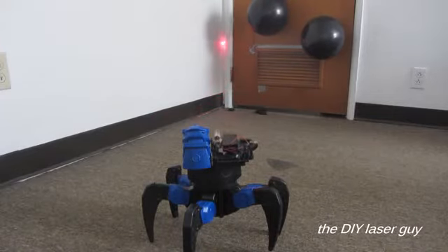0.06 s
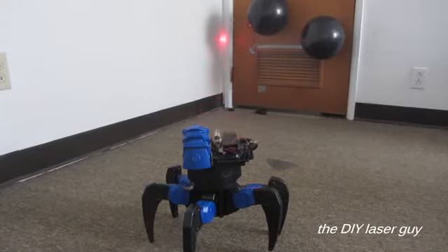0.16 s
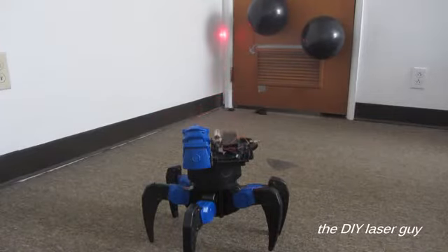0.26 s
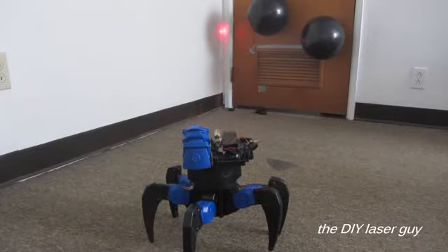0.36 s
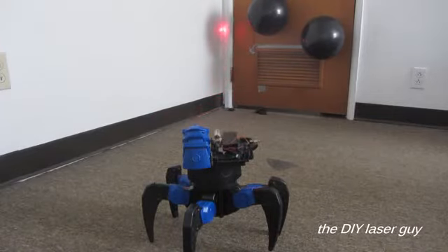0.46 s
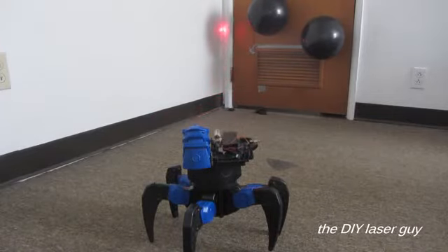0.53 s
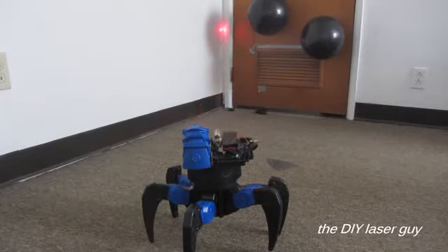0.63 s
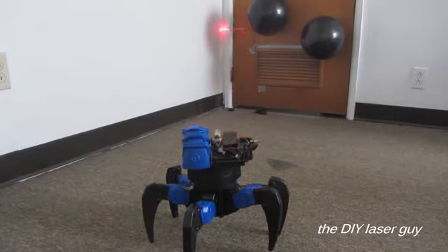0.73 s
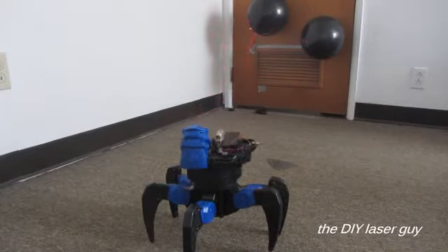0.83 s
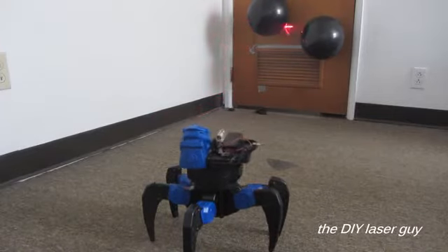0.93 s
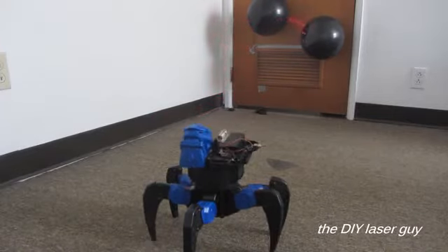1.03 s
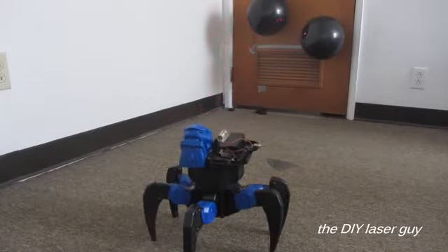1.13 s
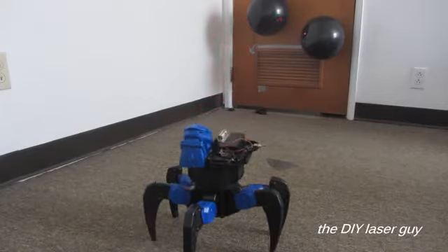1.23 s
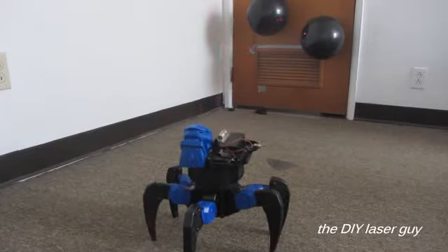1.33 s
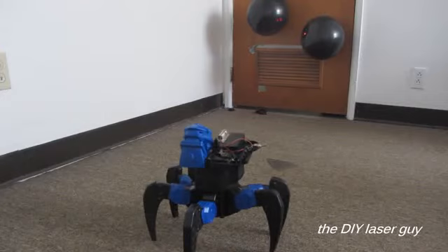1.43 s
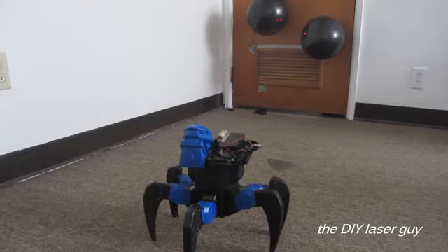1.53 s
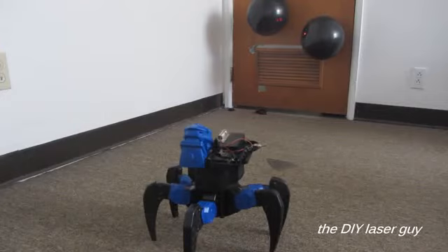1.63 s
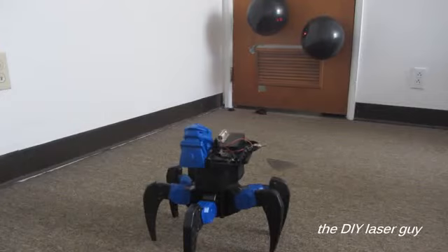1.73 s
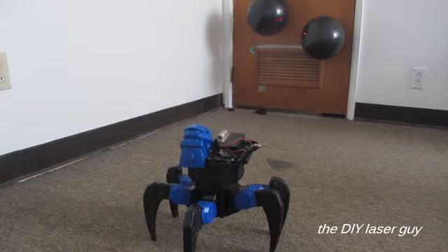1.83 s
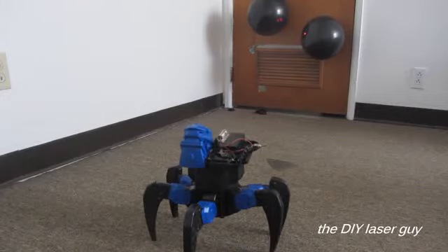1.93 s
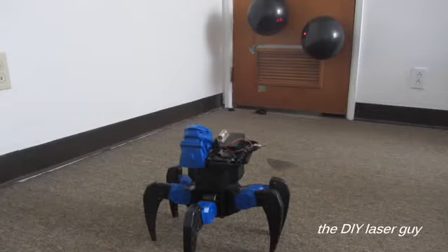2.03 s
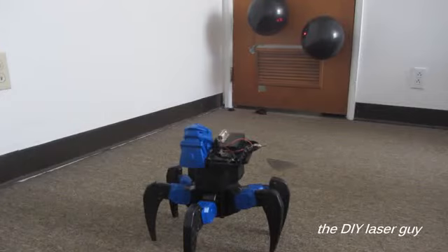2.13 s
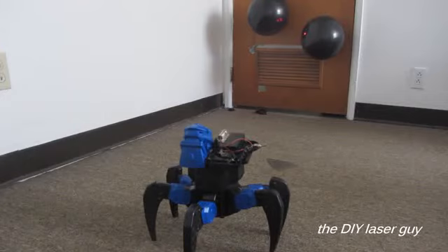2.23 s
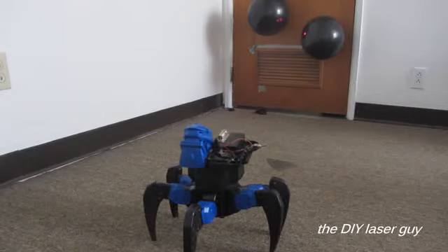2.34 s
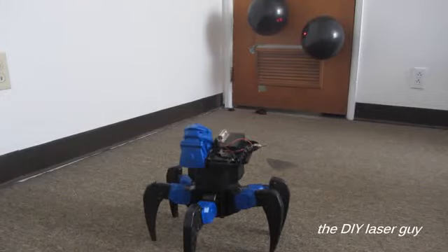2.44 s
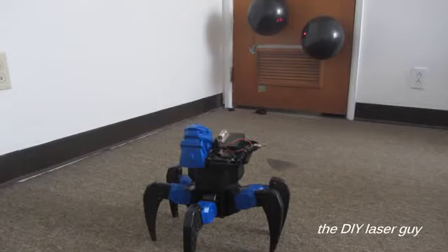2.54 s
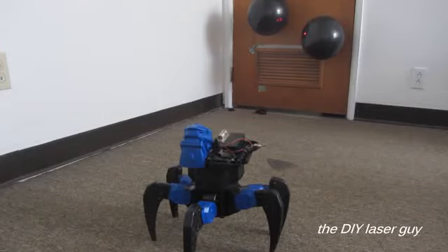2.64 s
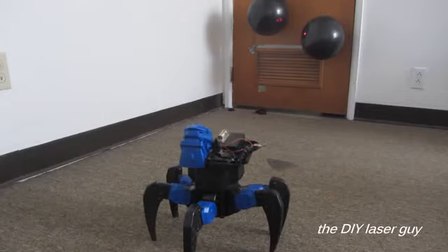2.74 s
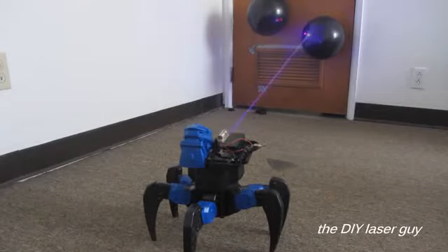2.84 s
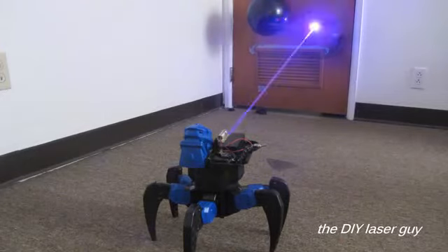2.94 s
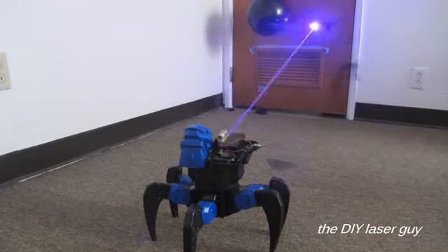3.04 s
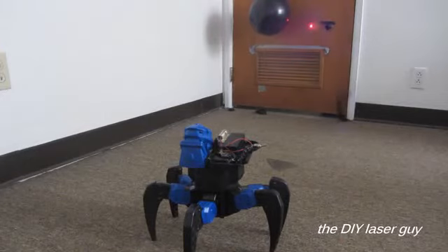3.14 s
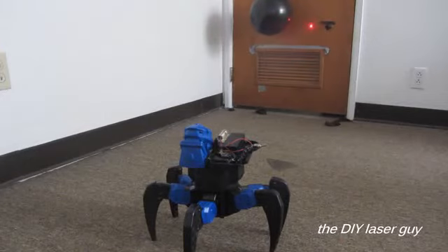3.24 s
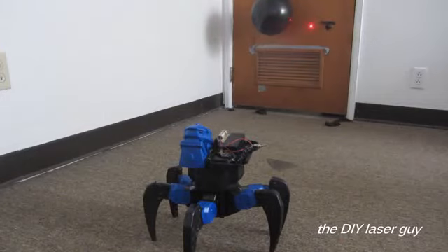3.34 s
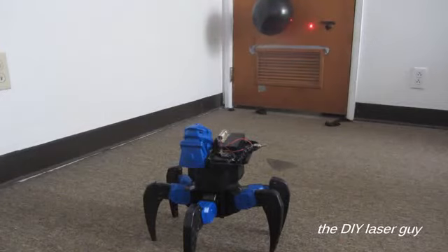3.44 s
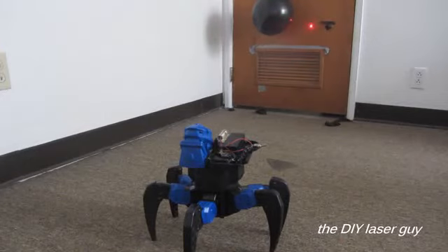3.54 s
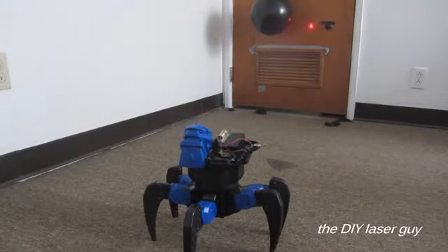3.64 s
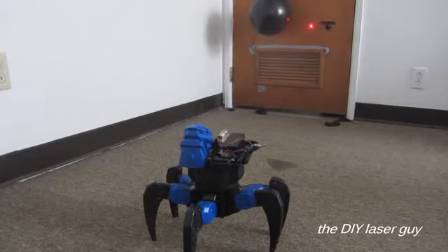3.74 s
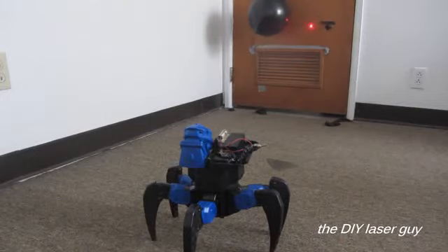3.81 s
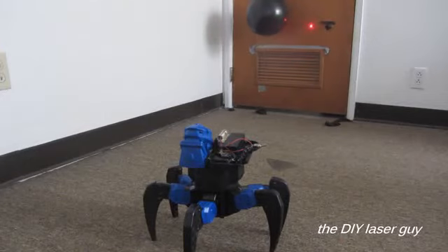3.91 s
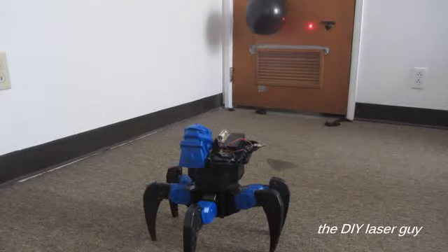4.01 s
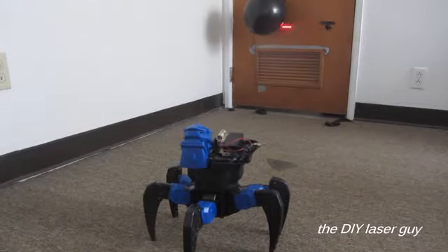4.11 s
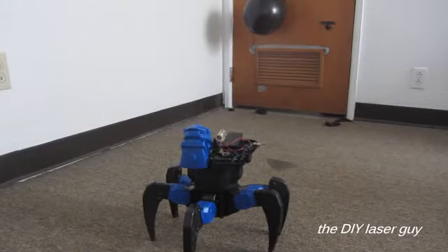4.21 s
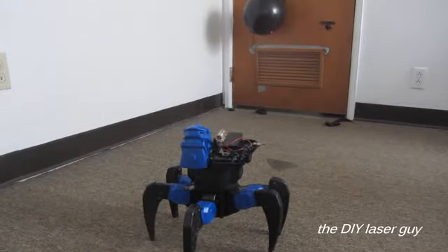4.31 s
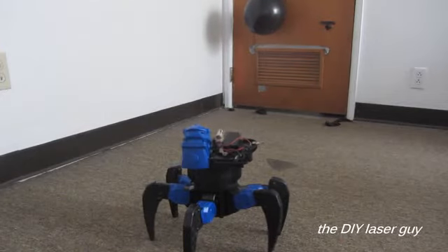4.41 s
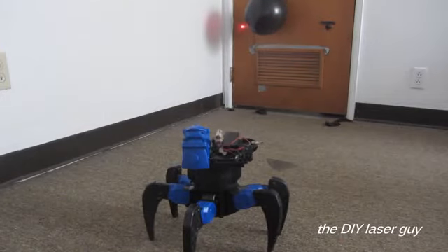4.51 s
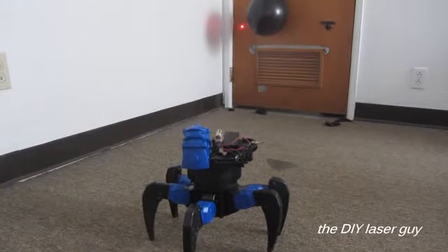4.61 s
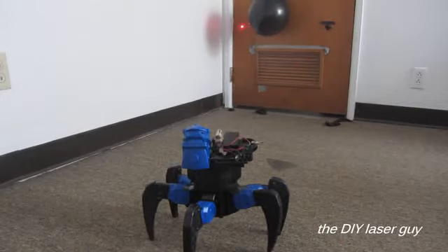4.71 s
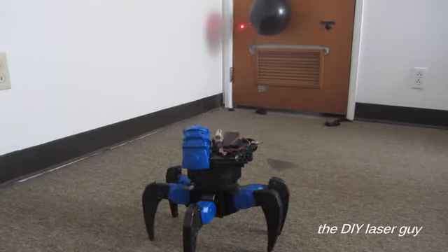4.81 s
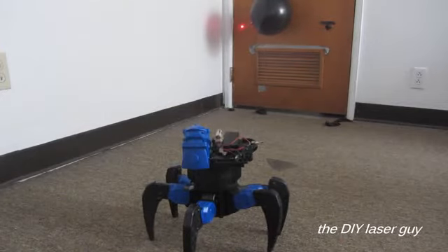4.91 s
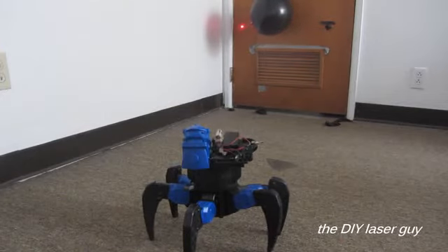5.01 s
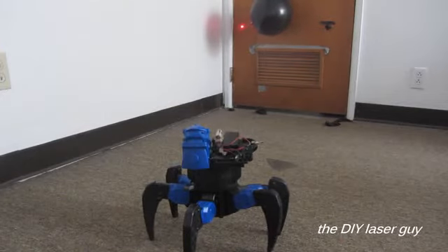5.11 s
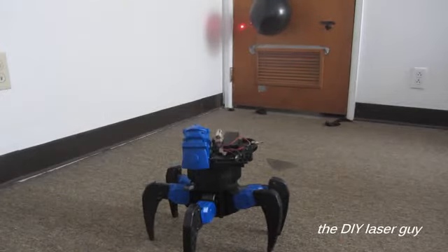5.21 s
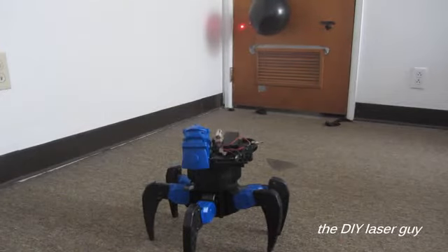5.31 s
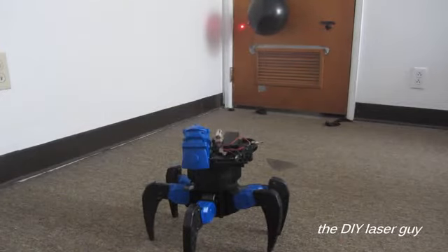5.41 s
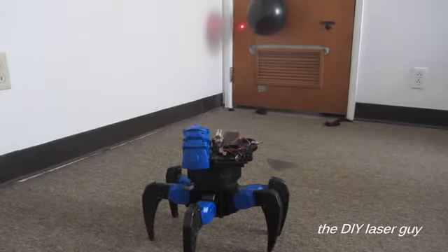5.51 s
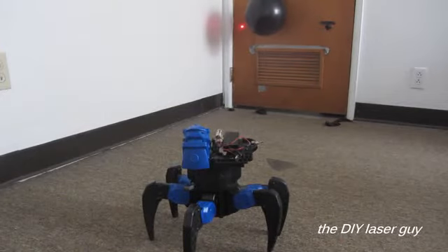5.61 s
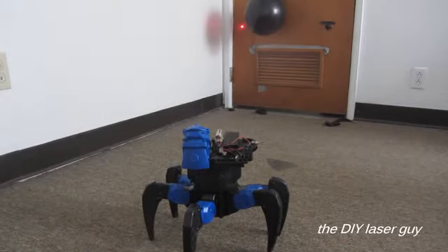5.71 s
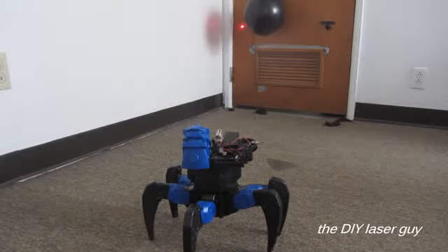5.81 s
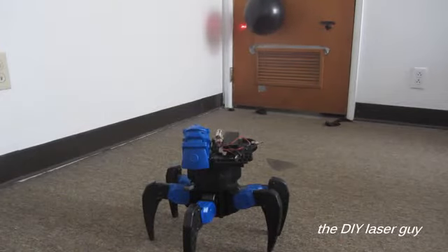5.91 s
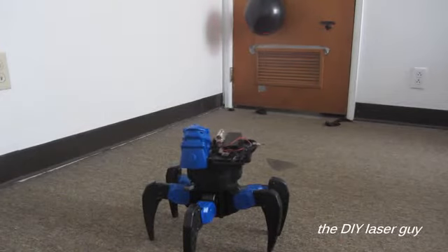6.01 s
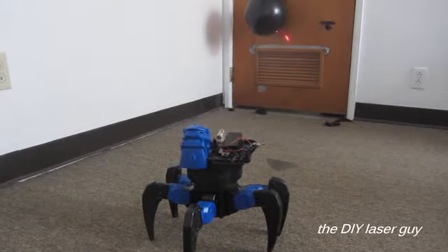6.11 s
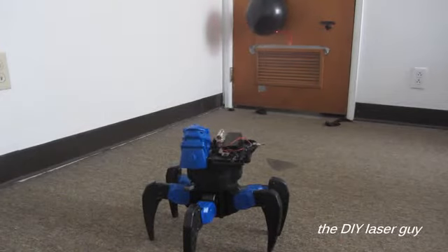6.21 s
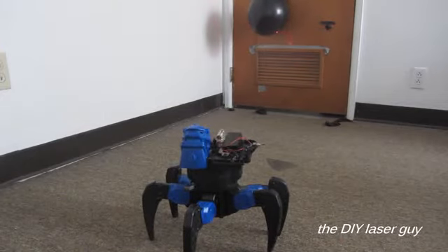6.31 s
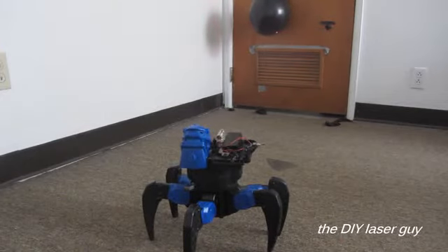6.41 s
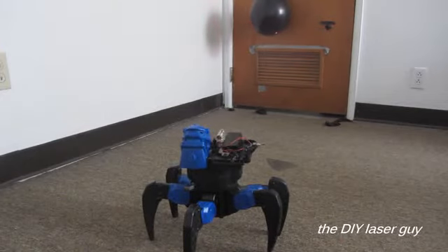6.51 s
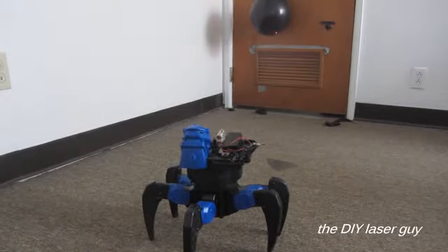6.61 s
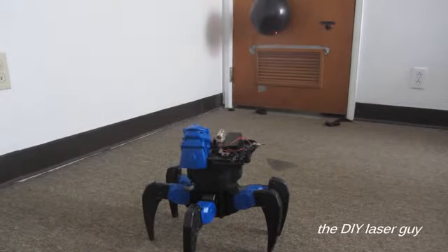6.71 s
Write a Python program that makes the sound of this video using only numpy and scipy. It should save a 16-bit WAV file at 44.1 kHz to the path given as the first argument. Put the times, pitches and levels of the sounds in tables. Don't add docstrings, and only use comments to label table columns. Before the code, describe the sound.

Brief rattly motor whirrs and light plastic clicks in a quiet room, a violent balloon pop at three seconds, then fainter whirrs and clicks.

```python
import sys
import numpy as np
from scipy import signal
from scipy.fft import rfft, irfft
from scipy.io import wavfile

SR = 44100
rng = np.random.default_rng(int(sys.argv[2]) if len(sys.argv) > 2 else 0)


def bounce(signal):
    frames = np.transpose(np.atleast_2d(signal))
    limited = np.clip(frames, -1, 1)
    pcm = np.round(limited * 32767).astype(np.int16)
    wavfile.write(sys.argv[1], SR, pcm)


def natural_amplitude(level_db):
    exponent = np.asarray(level_db, float) / 20
    return 10 ** exponent


N = 297675
TIME = np.arange(N) / SR
POP_S = 3.0498


def rms_one(x):
    return x / np.sqrt(np.mean(x ** 2) + 1e-20)


def at_hz(points, hz):
    table_hz, values = np.array(points)[:, 0], np.array(points)[:, 1]
    return np.interp(np.log(hz), np.log(table_hz), values)


def drift(rate):
    r = np.exp(-80 * np.pi * rate / SR)
    white = rng.standard_normal(N // 40 + 2002)
    slow = signal.lfilter([1], [1, -2 * r, r * r], white)[2000:]
    return np.interp(np.arange(N) / 40, np.arange(len(slow)), rms_one(slow))


def ring(x, hz, t60):
    r, w = natural_amplitude(-60 / (t60 * SR)), 2 * np.pi * hz / SR
    return signal.lfilter([0, np.sin(w)], [1, -2 * r * np.cos(w), r * r], x + 1e-18)


def body(x, peaks):
    out = 0
    for k, (hz, width, level_db) in enumerate(peaks):
        r = np.exp(-np.pi * width / SR)
        top = natural_amplitude(level_db) * (1 - r * r) / 2 * (-1) ** k
        poles = [1, -2 * r * np.cos(2 * np.pi * hz / SR), r * r]
        out = out + signal.lfilter([top, 0, -top], poles, x)
    return rms_one(out)


def banded_noise(spectrum, likeness, size, shape):
    out, edges = 0, 20 * 2 ** np.arange(0, 9.3, .5)
    white = rng.standard_normal((2, 2, size))
    for k, (low, high) in enumerate(zip(edges, edges[1:])):
        band = signal.butter(2, [low, high], "band", fs=SR, output="sos")
        mid, side = signal.sosfilt(band, white[k % 2])
        hz = np.sqrt(low * high)
        alike = np.clip(at_hz(likeness, hz), -1, 1)
        pair = np.sqrt(1 + alike) * mid + np.sqrt(1 - alike) * side * [[1], [-1]]
        out = out + natural_amplitude(at_hz(spectrum, hz)) * shape(hz) * pair
    return rms_one(out)


def automatic_gain_db():
    creep, recovery, drop_db = 3.0, 4.0, 19.5
    after = creep * POP_S - drop_db + recovery * (TIME - POP_S)
    return np.where(TIME > POP_S, after, creep * TIME)


def drones():
    # (start [s], end [s], first pitch [Hz], last pitch [Hz], level [dB])
    passes = [
        (.7, 1.154, 80, 88.3, -62.5),
        (1.388, 2.996, 91, 81.7, -63.5),
        (5.35, 6.0, 94, 90.7, -63.5),
    ]
    fade_s, lag_rad = .1, 0.99
    wobble_db, wobble_hz = 1.5, .7
    out = 0
    for start, end, first_hz, last_hz, level_db in passes:
        hz = np.interp(TIME, [start, end], [first_hz, last_hz]) + wobble_hz * drift(7.3)
        turn = 2 * np.pi * np.cumsum(hz) / SR
        fade = np.clip(np.minimum(TIME - start, end - TIME) / fade_s + .5, 0, 1)
        out = out + natural_amplitude(level_db + wobble_db * drift(3.0)) * fade * np.sin(turn + [[0], [lag_rad]])
    return out


def background():
    # (frequency [Hz], level [dB])
    rumble_spectrum = [(20, -17), (45, -14.5), (90, -12), (125, -1), (235, -5), (440, -11), (600, -12.5),
                       (1360, -20.5), (2500, -28.5), (3250, -50.5), (5500, -92.5)]
    # (frequency [Hz], level [dB per Hz])
    hiss_spectrum = [(590, -23.5), (1000, -1.5), (1290, -1.5), (1390, -7), (1580, -11.5), (2730, -5),
                     (3790, -14), (5640, -8), (8730, -21.5), (10800, -28), (14000, -58), (22000, -120)]
    # (frequency [Hz], left-right likeness [-1 to 1])
    floor_likeness = [(60, -0.87), (140, -0.62), (330, -0.56), (790, -0.083), (1850, -0.011), (4370, 0.39),
                      (10300, 0.55)]
    # (frequency [Hz], width [Hz], level [dB])
    hum_bands = [
        [(90, 5.7, 0)],
        [(59.4, 16, 0)],
    ]
    rumble_db, hiss_db, pan_db = -55.5, -70.5, -1.5
    hiss_follows = 1.24
    gain_db = automatic_gain_db()
    rumble = banded_noise(rumble_spectrum, floor_likeness, N, lambda hz: natural_amplitude(1.5 * drift(7.7)))
    upper = natural_amplitude(-71)
    lower = natural_amplitude(-72) + natural_amplitude(-67.5) * np.exp(-TIME / 1.0)
    hums = 0
    for level, band in zip([upper, lower], hum_bands):
        hums = hums + level * np.array([body(w, band) for w in rng.standard_normal((2, N))])
    hums = hums + 0.34 * hums[::-1]
    hiss = banded_noise(hiss_spectrum, floor_likeness, N, lambda hz: 1)
    lean = natural_amplitude(gain_db + pan_db * np.array([[.5], [-.5]]))
    low = natural_amplitude(rumble_db) * rumble + hums + drones()
    return lean * low + natural_amplitude(hiss_db + hiss_follows * gain_db) * hiss


def room_echo(colour):
    # (frequency [Hz], T60 [s])
    room_t60 = [(60, 1), (170, .65), (400, 0.7), (900, .75), (1800, 0.8), (3200, 0.82), (4500, .75),
                (7000, 0.54), (10500, .42)]
    # (frequency [Hz], left-right likeness [-1 to 1])
    room_likeness = [(60, 0.97), (140, 0.94), (330, 0.67), (790, 0.48), (1850, 0.067), (4370, 0.76),
                     (10300, 0.79)]
    t = TIME[:round(1.2 * SR)]
    flat = [(20, 0), (20000, 0)]
    tail = banded_noise(flat, room_likeness, len(t), lambda hz: natural_amplitude(-60 * t / at_hz(room_t60, hz)))
    colour_db = at_hz(colour, np.fft.rfftfreq(len(t), 1 / SR) + 1)
    tail = irfft(rfft(tail) * natural_amplitude(colour_db), len(t))
    fade = np.clip((1.1 - t) / .2, 0, 1)
    build_up = 1 - np.exp(-t / 0.0033)
    return rms_one(tail * fade * build_up) / np.sqrt(len(t))


def standing_waves(lines, gain_db, t60):
    t = np.clip(TIME - POP_S, 0, None)
    chance = rng.uniform(-np.pi, np.pi, (len(lines), 2))
    waves = 0
    for (hz, level_db), (phase, offset) in zip(lines, chance):
        lag = np.array([[0], [offset * min(hz / 930.0 + 0.55, 1)]])
        waves = waves + natural_amplitude(level_db) * np.sin(2 * np.pi * hz * t + phase + lag)
    return natural_amplitude(gain_db - 60 * t / t60) * (1 - np.exp(-t / 0.0015)) * waves


def balloon():
    # (frequency [Hz], level [dB])
    tail_colour = [(30, -28.5), (120, -23.5), (170, -10), (300, -12), (520, -6), (750, -16.5),
                   (1150, -16.5), (1700, -8.5), (2350, -20), (3200, -21.5), (3900, -29.5), (6000, -24),
                   (9000, -30.5), (11000, -37.5)]
    # (delay [s], left level [dB], right level [dB])
    wall_echoes = [
        (.0032, -12, -5.5),
        (.0052, -11, -12),
        (.0085, -14.5, -12.5),
        (.0115, -10, -14.5),
    ]
    # (frequency [Hz], level [dB])
    loud_waves = [(175.6, -39), (269.6, -38), (309, -37), (362.7, -38.5), (412, -36), (460.5, -36.5),
                  (512, -39.5), (1244, -48), (1440, -49.5), (1630, -42.5), (1668, -44), (1870, -49),
                  (2156, -48.5), (569, -42.5), (206.7, -42.5)]
    # (frequency [Hz], level [dB])
    late_waves = [(317.6, -74), (419.9, -77.5), (479.1, -65.5), (570.6, -70), (678.3, -82), (726.7, -77.5),
                  (877.5, -79), (1034, -82), (1087, -78.5), (1556, -78), (1604, -69), (1803, -77),
                  (1960, -70), (2013, -77.5), (2218, -79.5)]
    pop_db, tail_db, shock_s = 10.5, -13.5, 0.00045
    t = TIME - POP_S

    def jump(lag):
        return np.exp(-np.clip(t - lag, 0, None) / shock_s) * (t > lag)

    high = signal.butter(1, 220, "high", fs=SR, output="sos")
    shock = signal.sosfilt(high, jump(.0006) + 0.7 * jump(.0013))
    hit = np.zeros(N)
    hit[round(POP_S * SR)] = 1
    tear = natural_amplitude(-18.5) * rng.standard_normal(N) * np.exp(-np.abs(t) / 0.00091)
    skin = natural_amplitude(-3.5) * ring(hit, 1500, 0.0045)
    direct = natural_amplitude(pop_db) * (shock + tear + skin)
    direct = signal.sosfilt(signal.butter(2, 3500, fs=SR, output="sos"), direct)
    echoes = 0
    for k, (lag, left_db, right_db) in enumerate(wall_echoes):
        echoes = echoes + natural_amplitude([[left_db], [right_db]]) * np.roll(direct, round(lag * SR)) * (-1) ** k
    tail = signal.fftconvolve(hit[None], room_echo(tail_colour), axes=1)[:, :N] * np.sqrt(.1 * SR)
    waves = standing_waves(loud_waves, gain_db=18.0, t60=0.8)
    waves = waves + standing_waves(late_waves, gain_db=35.5, t60=1.35)
    return direct + echoes + natural_amplitude(tail_db) * tail * natural_amplitude([[-.4], [.4]]) + waves * natural_amplitude([[-1.4], [1.3]])


def clicks(events, parts, tilt_db):
    snap_loss = 50
    longest_t60_s = .022
    rows, out = np.array(events), np.zeros(N)
    at_s, second_db, lowest_db, sharp_db, contact_ms = rows.T
    at = np.round((at_s + 0.0027) * SR).astype(int)
    part_db = [lowest_db, 0, sharp_db + tilt_db / 2, sharp_db - tilt_db / 2 - snap_loss * contact_ms]
    luck = rng.normal(0, 1.5, (len(at), 12))
    span = np.arange(-50, 90)
    scratch = rng.standard_normal((len(at), len(span))) * np.exp(-(span / 54.0) ** 2) / 5.3
    push = np.exp(-(span / np.clip(contact_ms[:, None] * SR / 1000, .1, 20)) ** 2)
    push = push / push.sum(1, keepdims=True)
    for part, modes in enumerate(parts):
        for k, (hz, t60) in enumerate(modes):
            hits = np.zeros(N)
            force = natural_amplitude(second_db + part_db[part] + 6 + luck[:, 3 * part + k]) * (-1) ** k
            hits[at[:, None] + span] = force[:, None] * (scratch if part > 1 else push)
            out += ring(hits, hz, min(t60, longest_t60_s))
    return out


def lid_ring():
    hit = np.zeros(N)
    hit[round(5.75 * SR)] = natural_amplitude(-49)
    return ring(hit, 806, .25)


def remote_buttons():
    # (time [s], lid level [dB], case [dB rel], sharpness [dB rel], contact [ms])
    presses = [(1.193, -43.5, -6, -17, .05), (1.53, -51.5, -5, -14, 0.045), (1.872, -41.5, 0.5, -16, 0.21),
               (1.882, -40, -8, -20, 0.19), (1.899, -47, -6, -14, .25), (4.269, -62.5, 5, 0, .15),
               (4.529, -55.5, 0, -15, .05), (4.759, -55, 0, -18, .08), (4.879, -61, -13, -15, 0.095),
               (5.163, -58.5, 2, -18, .05), (5.26, -42, -13, -18.5, .06), (5.493, -49, -2.5, -13, .02),
               (5.744, -42.5, -22, -17, 0.019), (6.089, -63, 9, 3, .1)]
    # (frequency [Hz], T60 [s])
    remote_parts = [
        [(512, 0.034), (344, 0.019), (614, 0.01)],
        [(812, 0.024), (1050, 0.009), (1280, 0.01)],
        [(1800, 0.0054), (2500, 0.01), (3100, 0.011)],
        [(6030, 0.0063), (5060, 0.0065), (7240, 0.0015)],
    ]
    return clicks(presses, remote_parts, tilt_db=1.5)


def relay_ticks():
    # (time [s], second part [dB], lowest part [dB rel], sharpness [dB rel], contact [ms])
    ticks = [
        (2.738, -43, -5, -9.5, 0.022),
        (2.795, -51.5, 1, -6, .02),
        (6.434, -51, 5.5, -1.5, 0.019),
        (6.713, -54.5, 1, -4, .02),
    ]
    # (frequency [Hz], T60 [s])
    relay_parts = [
        [(1000, .01), (1400, .01)],
        [(1950, .014), (2500, .006)],
        [(3400, .006), (4000, .005), (4700, .005)],
        [(5600, .004), (6500, .004), (8000, .004)],
    ]
    return clicks(ticks, relay_parts, tilt_db=8)


def turret():
    # (start [s], length [s], full-speed rattle [dB], full-speed mesh [Hz], tooth hiss [dB rel])
    pushes = [(-0.1, 0.13, -46.5, 2250, -4.5), (0.108, 0.12, -45.5, 2250, -6.5),
              (0.281, 0.12, -45, 2090, -5.5), (0.461, 0.041, -43, 2200, -2.5),
              (0.785, 0.13, -42.5, 2520, -8), (0.986, 0.076, -42, 2630, -10.5),
              (1.12, 0.02, -45.5, 2300, -6), (4.108, 0.087, -53.5, 3330, -8),
              (4.435, 0.088, -53, 2720, -10), (5.086, 0.015, -51.5, 2330, -18),
              (5.651, 0.025, -50.5, 2350, -13), (5.989, 0.082, -45.5, 2660, -10.5)]
    spin_up_s, coast_s, rest_mesh_hz = .035, 0.12, 2126
    kick_rise_s, kick_s = 0.0045, 0.012
    start, length, level_db, full_hz, hiss_db = np.transpose(pushes)[:, :, None]
    t = TIME[::32] - start
    powered = 1 - np.exp(-np.clip(t, 0, length) / spin_up_s)
    lost = np.clip(t - length, 0, None) / coast_s
    speed = np.clip(powered - lost, 0, 1)
    kick = np.clip(t / kick_rise_s, 0, 1) * np.exp(-np.abs(t) / kick_s)
    rise_hz = np.sum((full_hz - rest_mesh_hz) * speed ** 2, 0)
    mesh_hz = rest_mesh_hz + rise_hz / np.maximum(speed.sum(0), 1e-3)
    strained = start < .7
    boom_db = np.where(strained, -9, -15.5)
    note_db = np.where(strained, -9.5, -22)
    parts = [speed + natural_amplitude(-23) * kick,
             speed + natural_amplitude(1.5) * kick,
             natural_amplitude(-7.5) * speed ** 0.73 + natural_amplitude(-14) * kick,
             natural_amplitude(hiss_db) * speed ** 1.37,
             natural_amplitude(boom_db) * speed ** 0.85,
             natural_amplitude(note_db) * speed ** 0.85]
    gains = [np.sqrt(np.sum((natural_amplitude(level_db) * p) ** 2, 0)) for p in parts]
    return [np.interp(TIME, TIME[::32], c) for c in [mesh_hz, *gains]]


def motor():
    # (frequency [Hz], width [Hz], level [dB])
    gear_modes = [(2160, 2100, 12), (3820, 400, -11), (2120, 150, 7)]
    shell_modes = [(1454, 320, -6), (1760, 175, 0), (1350, 690, -8.5)]
    tooth_modes = [(4430, 740, 7), (6100, 2650, 1), (8700, 1260, -0.5), (10570, 2900, -12)]
    housing_modes = [(560, 360, -2), (1110, 440, -4.5)]
    housing_note = [(818, 30, 0)]
    mesh_width_hz, mesh_db = 340, -3
    mesh_hz, rattle, mesh_gain, shell_gain, hiss_gain, boom_gain, note_gain = turret()
    sizes = natural_amplitude(1.04 * np.minimum(rng.exponential(1, N), 5)) * rng.choice([-1, 1], N)
    struck = rng.random(N) < 5000. / SR
    knocks = sizes * struck * natural_amplitude(1.67 * drift(39))

    def wheel(k):
        return np.roll(knocks, 5003 * k)

    turn = np.exp(2j * np.pi * np.cumsum(mesh_hz) / SR)
    narrow = signal.butter(2, mesh_width_hz / 2, fs=SR, output="sos")
    mesh = rms_one(np.real(signal.sosfilt(narrow, wheel(1) / turn) * turn))
    steep = signal.butter(2, [1500, 3800], "band", fs=SR, output="sos")
    gears = rms_one(signal.sosfilt(steep, body(knocks, gear_modes)))
    shell = body(body(wheel(2), shell_modes), [(1560, 810, 0)])
    teeth = body(body(wheel(3), tooth_modes), [(6020, 11400, 0)])
    note = body(wheel(4), housing_note)
    boom = body(wheel(5), housing_modes)
    whirr = 0.81 * (rattle * gears + natural_amplitude(mesh_db) * mesh_gain * mesh)
    return whirr + shell_gain * shell + hiss_gain * teeth + boom_gain * boom + note_gain * note


def scene():
    robot, relay, remote = motor(), relay_ticks(), remote_buttons()
    echo = room_echo([(100, 1.5), (3000, -1.5), (10000, -1.0)])
    echo = echo * (np.exp(-TIME[:echo.shape[1]] / 0.021) + natural_amplitude(-7.5))
    send = natural_amplitude(-2.5) * robot + natural_amplitude(-1.0) * relay + natural_amplitude(-4.5) * remote
    wet = signal.fftconvolve(send[None], echo, axes=1)[:, :N]
    near = (robot + relay) * natural_amplitude([[-1.5], [1.4]]) + (remote + lid_ring()) * natural_amplitude([[-2.3], [2.2]])
    return near + wet + balloon() + background()


def top_cut(x):
    return signal.sosfilt(signal.butter(12, 11120, fs=SR, output="sos"), x)


def record(dry):
    duck_db, release_s = 5.5, 0.11
    after = TIME - POP_S - .002
    duck = natural_amplitude(-duck_db * np.exp(-np.clip(after, 0, None) / release_s) * (after > 0))
    ducked = dry * duck
    x = np.tanh(ducked ** 3 / 3 + ducked)
    x = signal.sosfilt(signal.ellip(8, .5, 40, 10900, fs=SR, output="sos"), x)
    whistle = natural_amplitude(-90) * np.cos(np.pi * np.arange(N) / 2)
    return top_cut(np.clip(x + whistle, -1, 1))


dry = scene()
out = record(dry)
bounce(out)
```